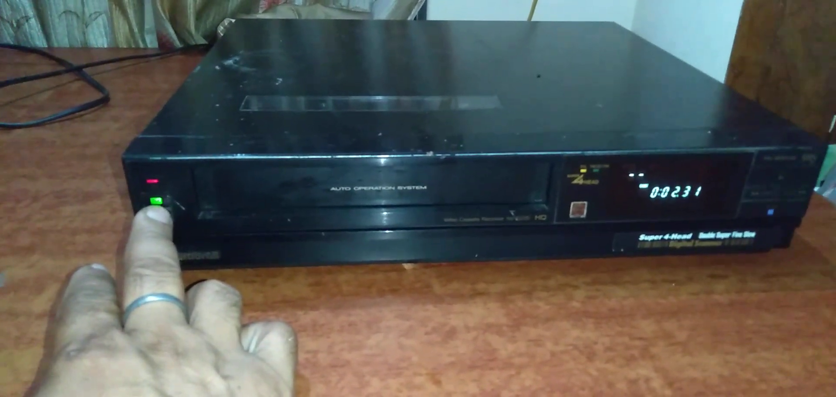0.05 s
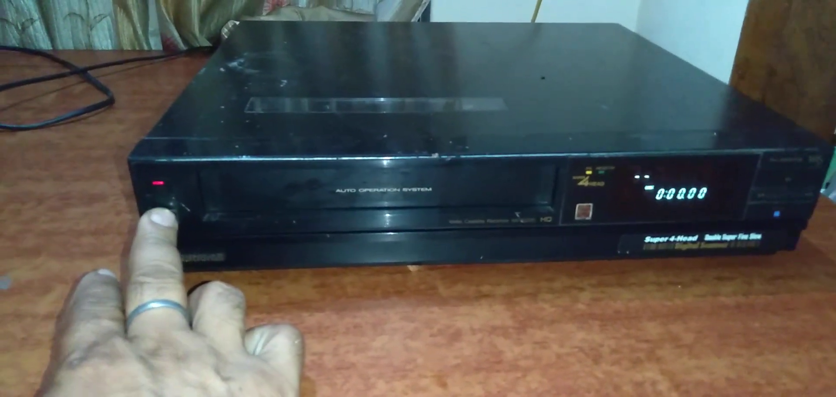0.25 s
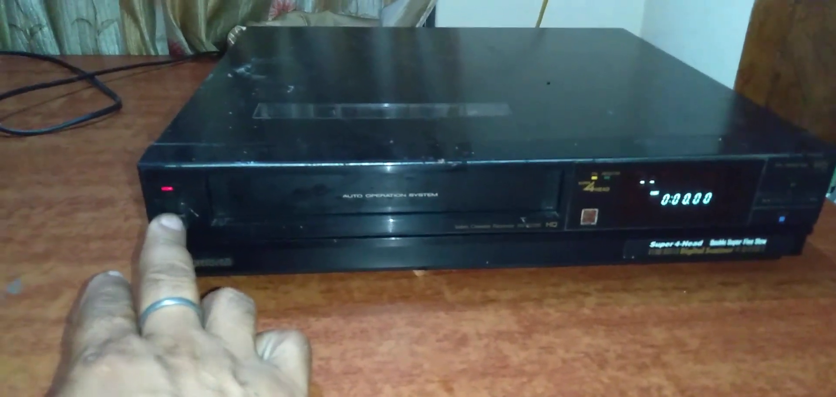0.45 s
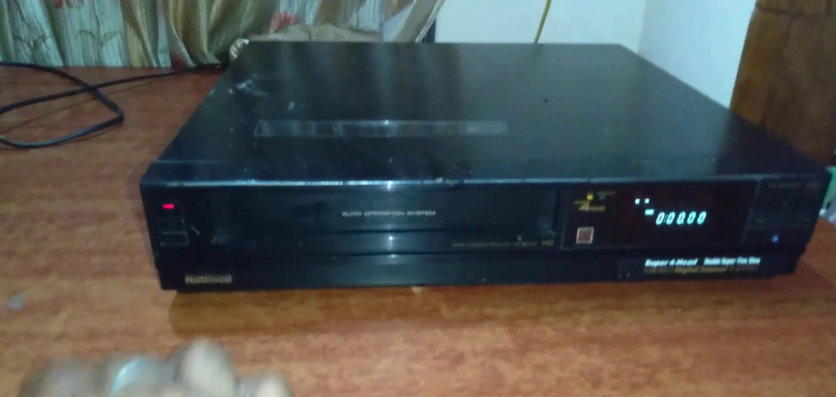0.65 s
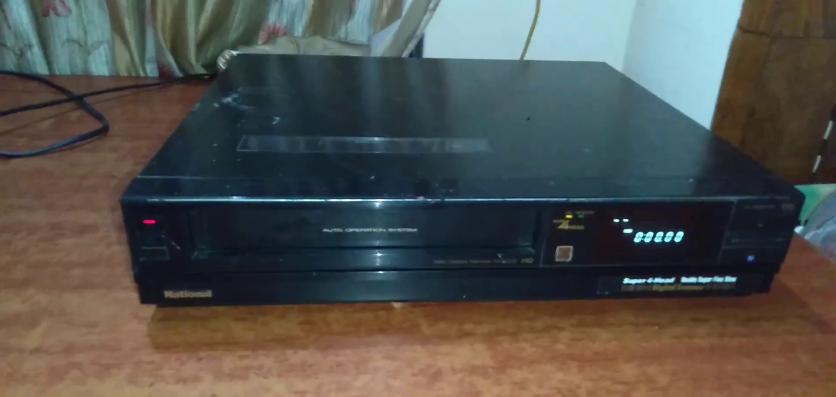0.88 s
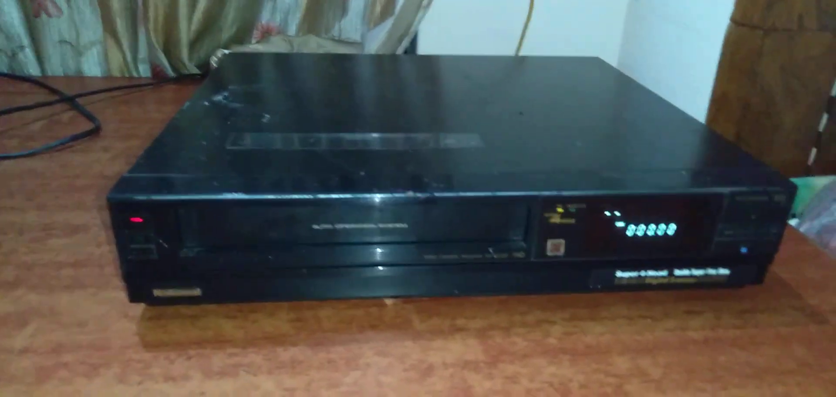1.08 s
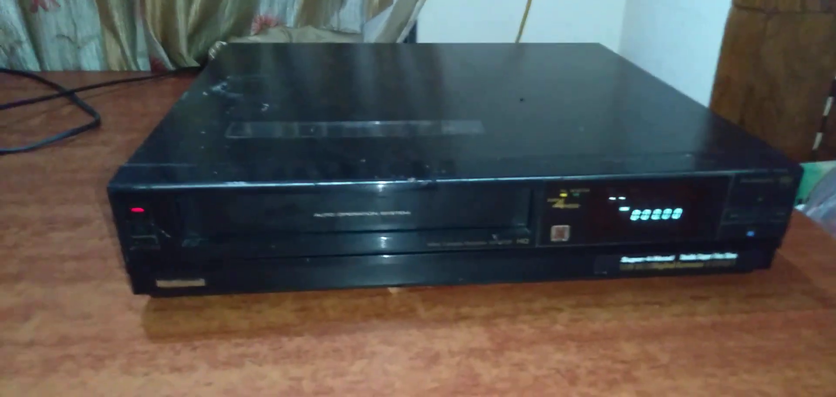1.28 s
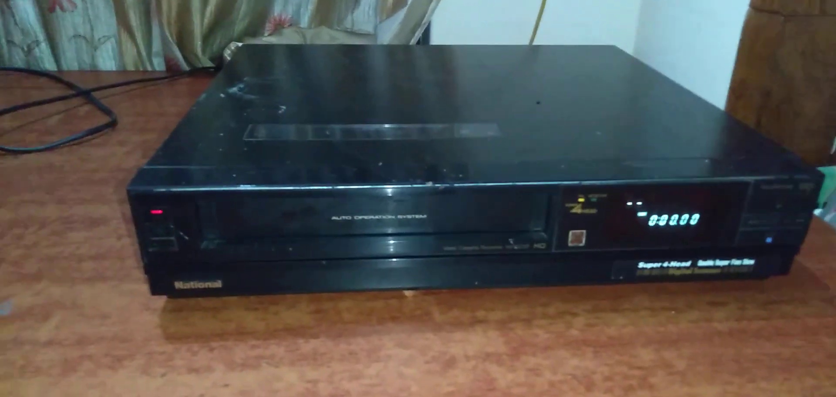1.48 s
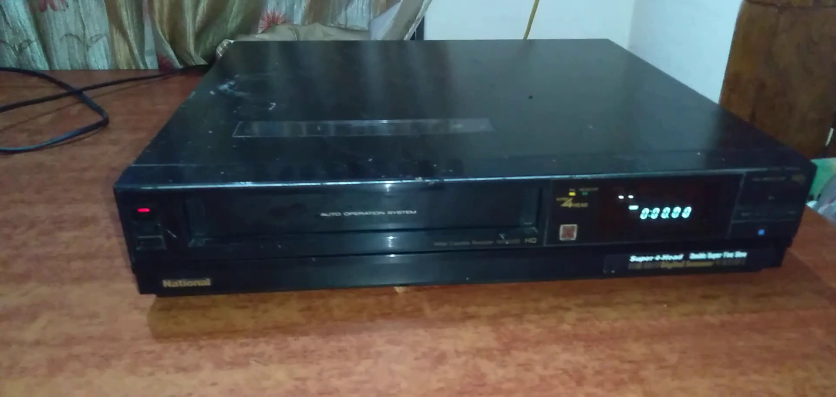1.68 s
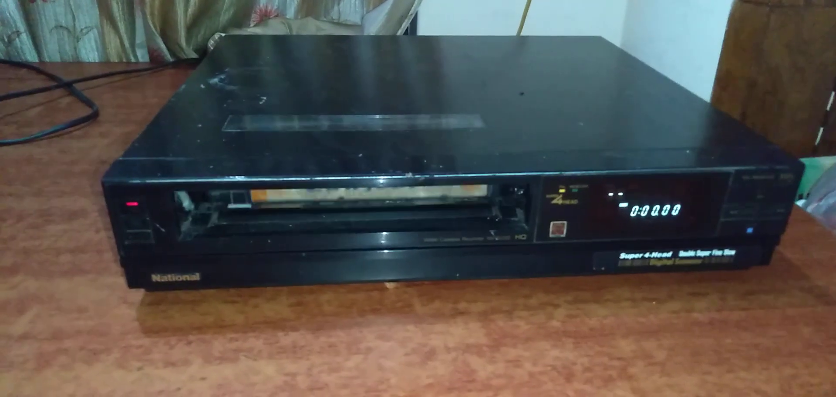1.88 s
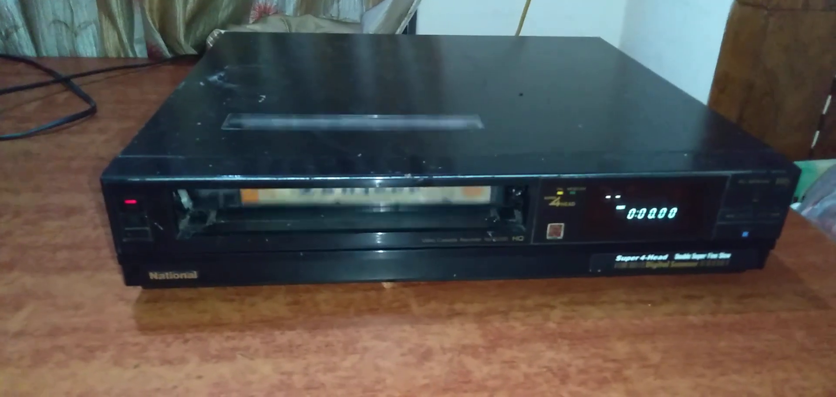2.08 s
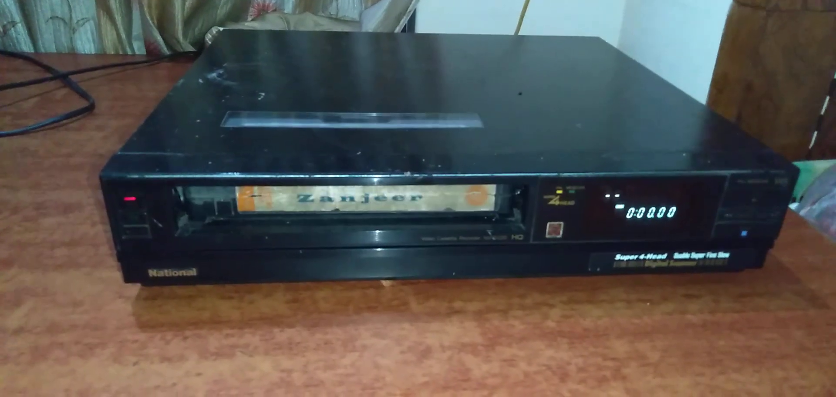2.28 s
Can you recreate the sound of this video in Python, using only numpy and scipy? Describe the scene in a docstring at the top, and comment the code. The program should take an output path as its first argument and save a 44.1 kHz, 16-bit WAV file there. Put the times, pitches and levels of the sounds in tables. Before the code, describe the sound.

Videotape player ejecting a cassette, its latches snapping, tape hissing and motor whirring.

```python
"""A small room, close to a wooden table on which a videotape deck ejects its cassette.
Latches and levers snap and ring the steel chassis and the plastic shell. Gear teeth whir, the tape
winds back hissing over its guides, and the carriage rumbles up and clacks against its end stop.
A motor hums and whines throughout; the resonances of the drive's frame colour its running noise."""
import sys
import numpy as np
from scipy import signal
from scipy.fft import rfft, irfft, next_fast_len
from scipy.io import wavfile
from scipy.ndimage import uniform_filter1d

SR = 44100
rng = np.random.default_rng(int(sys.argv[2]) if len(sys.argv) > 2 else 0)


def transcribe(signal):
    """Save signal, clipped to [-1, 1], as a 16-bit WAV file at the path in sys.argv[1]."""
    frames = np.atleast_2d(signal).T
    limited = np.clip(frames, -1, 1)
    pcm = np.round(limited * 32767).astype(np.int16)
    wavfile.write(sys.argv[1], SR, pcm)


N = 108045
ATTACK_S = 0.0014  # onset of the snaps and the end stop


def undb(db):
    """Decibels to gain."""
    return 10 ** (np.asarray(db) / 20)


def seconds():
    """The time of every sample."""
    return np.arange(N) / SR


def unit(x):
    """Scale to rms 1."""
    return x / np.sqrt(np.mean(x ** 2) + 1e-20)


def fader(table, column=1):
    """Gain that rides one dB column of a table over time."""
    rows = np.array(table)
    return undb(np.interp(seconds(), rows[:, 0], rows[:, column]))


def colour(x, eq, band=None):
    """Shape x with an EQ curve, optionally within one band only; rms 1."""
    size = next_fast_len(N)
    hz = np.maximum(np.arange(size // 2 + 1) * SR / size, 1)
    eq_hz, eq_db = np.array(eq).T
    gain = undb(np.interp(np.log(hz), np.log(eq_hz), eq_db))
    if band is not None:
        gain = gain / np.sqrt((1 + (band[0] / hz) ** 16) * (1 + (hz / band[1]) ** 16))
    return unit(irfft(rfft(x, size) * gain, size)[:N])


def noise():
    """White noise."""
    return rng.standard_normal(N)


def walk(rate_hz):
    """Random drift: glides to a new value rate_hz times a second; rms 1."""
    hold = max(int(SR / rate_hz), 1)
    return unit(uniform_filter1d(noise()[np.arange(N) // hold], hold))


def tone(hz, wander):
    """A sine of rms 1 whose pitch wanders by a fraction of itself."""
    return np.sqrt(2) * np.sin(2 * np.pi * np.cumsum(hz * (1 + wander * walk(70))) / SR)


def during(start, end, ramp_s):
    """A gate, open from start to end, with short ramps."""
    t = seconds()
    return np.clip(np.minimum(t - start, end - t) / ramp_s + .5, 0, 1)


def frame(x, amount=1):
    """The drive's frame lifts narrow resonances in the noise that passes through it."""
    # frame resonances: centre_hz
    centres = [743, 880, 1330, 1750, 2150, 2400, 2830, 3290, 3790, 4250, 4620, 4920, 5590, 6010, 6330, 6600,
               7240, 7620, 7900, 8170, 8550, 8945, 9270, 9720, 9980, 11100]
    # their peaks at full amount: lift_db
    lifts = [10, 14, 12, 5.5, 7, 11, 12.5, 12, 11, 2, 16, 14.5, 9.5, 13, 11, 13.5, 10.5, 8, 6, 8, 9.5, 8.5,
             6.5, 7, 0, 8.5]
    size, width_hz = next_fast_len(N), 86
    hz = np.arange(size // 2 + 1) * SR / size
    gain = 1 + sum((undb(db) - 1) / (1 + ((hz - centre) / width_hz * 2) ** 2)
                   for centre, db in zip(centres, lifts))
    return irfft(rfft(x, size) * gain ** amount, size)[:N]


def motor():
    """The motor hums and whines on multiples of its shaft rate, over soft running noise."""
    # motor tones: multiple of the shaft rate
    orders = [3, 5, 9, 10, 36, 67, 68, 102, 136, 168, 171, 176, 184]
    # the same tones: level_db
    levels = [-67, -56, -62.5, -61, -80, -67.5, -68, -76, -75, -58, -75.5, -71, -59]
    # running noise EQ: frequency_hz, gain_db
    running_eq = [(30, -31), (120, -8.5), (250, -4.5), (360, 7.5), (480, -7.5), (580, -33.5), (730, -8.5),
                  (900, -17.5), (1100, -15.5), (2200, -47.5), (3300, -31), (4800, -34.5), (6200, -35.5),
                  (7400, -41.5), (8100, -12), (9000, -17.5), (10300, -36), (12000, -27), (13500, -46.5),
                  (15800, -53)]
    shaft_hz, wander, flicker_db = 48.6, 0.00066, 2
    angle = 2 * np.pi * np.cumsum(shaft_hz * (1 + wander * walk(29.48))) / SR
    hum = sum(undb(db + flicker_db * walk(18)) * np.sqrt(2) * np.sin(order * angle)
              for order, db in zip(orders, levels))
    return hum + undb(-54) * colour(frame(noise()), running_eq)


def teeth():
    """Uneven gear teeth, each a tiny burst of friction noise, with stray ticks of loose play."""
    tooth_hz, tooth_decay_s = 190.6, 0.0029
    ticks_per_s, tick_decay_s = 68, 0.00089
    teeth_passed = np.cumsum(tooth_hz * np.exp(.15 * walk(150))) / SR
    strength = 0.63 * undb(2 * noise()[teeth_passed.astype(int) % N])
    bursts = strength * np.exp(-(teeth_passed % 1) / tooth_hz / tooth_decay_s)
    ticks = (rng.random(N) < ticks_per_s / SR) * rng.random(N)
    rattle = undb(1) * signal.lfilter([1], [1, -np.exp(-1 / (tick_decay_s * SR))], ticks)
    return noise() * (1 + rattle + bursts)


def gears():
    """Gear teeth whir under load, and the drive rasps brightly near 8.5 kHz."""
    # gears under load: start_s, end_s, level_db
    loads = [(-.01, 0.044, -49.5), (0.057, 0.17, -55.5), (0.386, 0.63, -53.5), (1.57, 1.72, -55),
             (1.874, 2.284, -47.5)]
    # whir EQ: frequency_hz, gain_db
    whir_eq = [(120, -26), (250, 19), (450, -1), (580, -52), (900, 2.5), (1300, -5), (2000, -45),
               (3000, -12.5), (5000, -17.5), (6500, -15.5), (7500, -59), (8500, -39), (11500, -9),
               (15000, -44)]
    # rasp fader: time_s, level_db
    rasp_ride = [(0, -53.5), (.2, -91), (.40, -72), (.48, -43.5), (.58, -49.5), (.66, -47), (.682, -36),
                 (.73, -35.5), (.80, -39.5), (1.0, -47.5), (1.12, -43.5), (1.25, -46.5), (1.45, -55),
                 (1.68, -55.5), (1.85, -47.5), (2.31, -62), (2.37, -35), (2.40, -35), (2.45, -45.5)]
    # rasp EQ: frequency_hz, gain_db
    rasp_eq = [(5500, -118), (6900, -18), (7500, -12), (8100, 4.5), (8700, -2.5), (9300, 0), (10000, -14.5),
               (11200, -15.5), (12000, -50)]
    load = sum(undb(db) * during(start, end, ramp_s=0.011) for start, end, db in loads)
    whir = load * colour(frame(teeth()), whir_eq)
    rasp = fader(rasp_ride) * colour(frame(teeth()), rasp_eq)
    return whir + rasp


def carriage():
    """The moving carriage shakes the case, which rumbles, knocks and groans."""
    # rumble fader: time_s, level_db
    rumble_ride = [(0, -51), (.2, -62), (.32, -54), (.5, -56), (.9, -60.5), (1.15, -45.5), (1.44, -73),
                   (1.54, -49), (1.7, -50.5), (1.84, -45.5), (1.93, -47), (2.05, -38.5), (2.16, -49.5),
                   (2.3, -44.5), (2.45, -48)]
    # rumble EQ: frequency_hz, gain_db
    rumble_eq = [(18, -46), (30, -19), (92, -2), (118, -9.5), (146, 3), (171, -1.5), (215, -0.5),
                 (246, 10.5), (305, -9.5), (402, -19), (439, -22), (516, -23), (600, -26), (780, -41),
                 (1320, -120)]
    # low knocks and groans: start_s, pitch_hz, level_db, swell_s, decay_s
    thumps = [(0.093, 203, -37.5, 0.026, 0.048), (0.184, 202, -35.5, 0.0049, 0.013),
              (.30, 152, -48.5, 0.016, 0.061), (.67, 80, -48.5, .015, 0.013),
              (1.165, 121.8, -45, 0.0046, 0.016), (1.64, 161, -47.5, 0.0074, 0.018),
              (1.758, 170, -33.5, 0.0035, 0.012), (2.03, 88, -44.5, .02, 0.052),
              (2.189, 300, -37.5, .012, 0.026), (2.245, 105.3, -43.5, .012, .04),
              (2.27, 145, -42, 0.032, 0.11)]
    surge = undb(1.5 * walk(35))
    out = fader(rumble_ride) * surge * colour(noise(), rumble_eq)
    for start, hz, db, swell, decay in thumps:
        age = seconds() - start
        envelope = np.clip(age / swell, 0, 1) * np.exp(-np.maximum(age - swell, 0) / decay)
        out += undb(db) * envelope * tone(hz, wander=.015)
    return out


def ringing_modes(t, pitches, levels, t60_s):
    """Damped resonances of a struck part, one complex row per mode."""
    return np.array([undb(db) * np.exp((2j * np.pi * hz - np.log(1000) / t60_s) * t)
                     for hz, db in zip(pitches, levels)])


def strike(modes):
    """One hit sets all the modes ringing at random phases."""
    return (np.exp(2j * np.pi * rng.random(len(modes))) @ modes).imag


def snaps():
    """Latches, levers and carriage snap: hard blows, and tails of case, room, steel and plastic."""
    # snap cues: start_s, peak_db (unused), bass_db, low_mid_db, mid_db, upper_mid_db, presence_db,
    # treble_db, top_db, contact_s, tail_db
    cues = [(0.076, -7, -57, -60, -32, -40, -35, -47, -51, 0.0037, -11),
            (0.23, 2, -29.5, -50, -27, -34, -26, -19, -29, 0.0038, -10.5),
            (0.233, 18, -60, -22.5, -27, -27, -14, -7, -23.5, 0.004, -10.5),
            (0.287, 10, -32, -41, -47, -46, -26.5, -15.5, -47, 0.0032, -10.5),
            (0.404, -24, -29, -44.5, -49, -69, -40.5, -32, -43, 0.0026, -14),
            (0.506, -41, -58, -40, -62, -47, -34, -27, -60, 0.0044, -10),
            (0.583, -30, -57, -63, -63, -62, -38, -61, -51, 0.0023, -9),
            (0.789, -23, -56, -44, -44.5, -38.5, -33.5, -39, -50, 0.0042, -6.5),
            (1.109, -21, -42.5, -72, -62, -75, -46, -38, -44, 0.0032, -6),
            (1.169, -32, -28.5, -71, -65, -59, -52.5, -33, -63, 0.0017, -15),
            (1.468, -11.5, -44, -43.5, -41.5, -42, -35, -26, -42, 0.0063, -2),
            (1.475, -14, -42, -29.5, -31.5, -35.5, -24, -16.5, -26.5, 0.0035, -13.5),
            (1.492, -15, -24, -36.5, -45, -54, -46, -24, -54, 0.0047, -11),
            (1.54, -13, -29, -35, -27, -31.5, -31.5, -22, -38, 0.0037, -13.5),
            (1.616, -27.5, -34, -44, -47, -58, -39, -39, -56, 0.003, -9),
            (1.665, -26, -56, -64, -44, -71, -43, -30, -46.5, 0.0031, -12),
            (1.711, -40, -53, -57, -46, -69, -51, -54, -49, 0.0035, -11),
            (1.759, -39, -30, -46, -65, -75, -63, -47, -68, 0.0019, -10.5),
            (1.78, -38, -47, -41, -45, -66, -55.5, -62, -70, 0.0013, -3),
            (1.8, -35, -56, -61, -61, -78, -71, -67, -78, 0.0038, -20),
            (1.888, -25, -29.5, -40, -45.5, -48, -32.5, -37, -51, 0.003, -10),
            (1.898, -26, -27.5, -41, -38, -44, -43, -52, -52, 0.0049, -12),
            (1.911, -20, -35, -33.5, -34, -38, -31.5, -44, -59, 0.0041, -10.5),
            (1.921, -17, -30, -46, -32.5, -34, -27.5, -27.5, -41.5, 0.0038, -16),
            (1.986, -14, -33, -29, -28.5, -29, -26.5, -28.5, -44, 0.0056, -7.5),
            (2.122, -16, -28, -32, -29, -32.5, -25.5, -24, -36.5, 0.0026, -10),
            (2.188, -10, -31, -26, -33, -29, -25, -29.5, -37, 0.0031, -12)]
    # borders of those seven bands: frequency_hz
    edges = [150, 450, 1000, 1750, 3200, 7000, 10000, 16000]
    # response of each band: blow_trim_db, tail_trim_db, tail_t60_s
    responses = [(-13.5, -5.5, 0.46), (-4.5, 3.5, 0.3), (-2, -0.5, 0.31), (-3.5, 0, 0.38),
                 (-1.5, -0.5, 0.33), (-5.5, -8, .36), (4.5, 5, 0.33)]
    # snap EQ: frequency_hz, gain_db
    snap_eq = [(88, -35), (150, -12), (172, 2), (244, 5), (308, 6.5), (405, -6), (553, -10), (699, 0.5),
               (771, -8), (1070, -4.5), (1210, 0.5), (1820, -6.5), (2120, -7), (2390, -9.5), (2960, -14),
               (5100, -10), (7530, -8.5), (8310, -2), (12300, -22.5), (13800, -28), (15800, -29)]
    # ring of the steel chassis: pitch_hz
    steel_hz = [3818, 4221, 4560, 4912, 5371, 6002, 6169, 6470, 6750, 6811, 6944, 7559, 7657, 7863, 8192,
                8235, 8408, 8517, 8767, 9157]
    # balance of the steel modes: gain_db
    steel_db = [1.5, -12, -9, -13, -13.5, -11, -4, -3, -4, -7.5, 10, -5, 0, -1, 8.5, 0, -12, -12, -10, -7]
    # hollow ring of the cassette shell and plastic front: pitch_hz
    shell_hz = [605, 632, 701, 943, 1042, 1244, 1411, 1620, 1747, 2083, 2750]
    # balance of the plastic modes: gain_db
    shell_db = [-9, 1.5, -2.5, 4.5, -7, -9, -3, -10.5, -9, -1, -9]
    release_s, tail_build_s = 0.0029, 0.0013
    out, t = np.zeros((2, N)), seconds()[:SR // 2]
    bands = [colour(frame(noise(), amount=0.37), snap_eq, band) for band in zip(edges, edges[1:])]
    rises = [np.minimum(t / (ATTACK_S + 1 / hz), 1) for hz in edges[1:]]  # low bands speak later
    build = 1 - np.exp(-t / tail_build_s)
    fades = [undb(db) * build * np.exp(-np.log(1000) * t / t60) for _, db, t60 in responses]
    steel = ringing_modes(t, steel_hz, steel_db, t60_s=0.26)
    shell = ringing_modes(t, shell_hz, shell_db, t60_s=0.16)
    for start, _, *band_db, contact_s, tail_db in cues:
        shift = rng.integers(N - len(t))
        grains = [undb(db) * band[shift:shift + len(t)] * rise
                  for db, band, rise in zip(band_db, bands, rises)]
        contact = np.exp(-np.maximum(t - contact_s, 0) / release_s)
        blow = contact * sum(undb(trim) * grain for (trim, _, _), grain in zip(responses, grains))
        wash = (1 - contact) * sum(fade * grain for fade, grain in zip(fades, grains))
        # bright snaps ring the steel, mid-heavy ones the plastic
        _, low_mid, mid, _, presence, treble, _ = band_db
        steel_ring = undb((presence + treble) / 2 - 15.5) * strike(steel)
        shell_ring = undb((low_mid + mid) / 2 - 8.5) * strike(shell)
        tail = undb(tail_db) * (wash + rises[-1] * (steel_ring + shell_ring))
        first = int(start * SR)
        out[:, first:first + len(t)] += np.array([blow, tail])[:, :N - first]
    return out


def winding():
    """Tape rubs and hisses over its guides as the reel hums; the drive coasts with a rising whine."""
    # winding faders: time_s, rub_db, hiss_db, reel_db
    rides = [(.66, -85, -78, -78), (.70, -71, -41.5, -87), (.75, -46.5, -36.5, -59),
             (.80, -40.5, -36.5, -49), (.90, -45.5, -38.5, -50.5), (1.0, -48, -39, -49.5),
             (1.11, -53.5, -57, -49), (1.2, -53.5, -62, -51), (1.42, -71.5, -70, -56.5),
             (1.5, -84, -84, -86)]
    # rub EQ: frequency_hz, gain_db
    rub_eq = [(100, -21), (240, 1.5), (350, 1), (490, 5.5), (580, -9.5), (800, -4), (1080, -22), (1400, -7),
              (2400, -12.5), (3500, -12), (4800, -11.5), (5400, -11), (6400, -11), (7500, -24), (9500, -40)]
    # hiss EQ: frequency_hz, gain_db
    hiss_eq = [(5000, -27.5), (7000, -10), (9500, -5), (12000, -2.5), (14000, -13), (15700, 1.5)]
    # whine of the coasting reel drive: time_s, pitch_hz, level_db
    coast = [(1.12, 700, -86), (1.2, 705, -58), (1.301, 750, -54.5), (1.42, 805, -56), (1.5, 810, -73)]
    rub = fader(rides, column=1) * colour(frame(teeth()), rub_eq) * undb(walk(40))
    hiss = fader(rides, column=2) * colour(noise(), hiss_eq)
    times, pitches, _ = np.array(coast).T
    whine = fader(coast, column=2) * tone(np.interp(seconds(), times, pitches), wander=0.025)
    reel = fader(rides, column=3) * tone(hz=351.5, wander=.012)
    return rub + hiss + whine + reel


def end_stop():
    """The cassette hits its end stop with a hollow plastic knock."""
    # modes of the knock: pitch_hz, level_db, decay_s
    modes = [(641, -31.5, 0.0084), (770, -37, .012), (1620, -34, 0.011), (1850, -34, 0.007),
             (2080, -35, 0.0086)]
    start_s = 2.189
    age = np.maximum(seconds() - start_s, 0)
    knock = sum(undb(db) * np.exp(-age / decay) * tone(hz, wander=.02) for hz, db, decay in modes)
    return np.minimum(age / ATTACK_S, 1) * knock


def squeak():
    """A thin squeak as the cassette comes to rest."""
    return undb(-63.5) * during(2.402, 2.46, ramp_s=0.0044) * tone(hz=3800, wander=0.013)


def scene():
    """The whole deck in mono; between its moves all but the blows and the end stop dips in level."""
    # level dips: start_s, end_s, gain_db
    dips = [(0.023, 0.069, -11.5), (0.148, 0.225, -12.5), (.489, 0.501, -16), (0.585, 0.671, -12),
            (1.125, 1.464, -11.5), (1.714, 1.88, -12)]
    dip_db = sum(db * during(start, end, ramp_s=0.00365) for start, end, db in dips)
    blows, tails = snaps()
    bed = tails + motor() + winding() + squeak() + gears() + carriage()
    return (blows + bed * undb(dip_db) + end_stop())[None]


def record(dry):
    """A steep low-pass cuts the very top."""
    cutoff_hz = 15700
    return signal.sosfilt(signal.ellip(10, .2, 70, cutoff_hz, fs=SR, output="sos"), dry)


dry = scene()
out = record(dry)
transcribe(out)
```